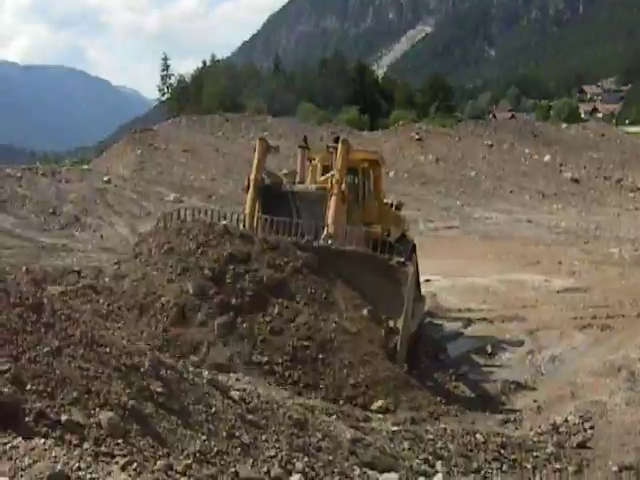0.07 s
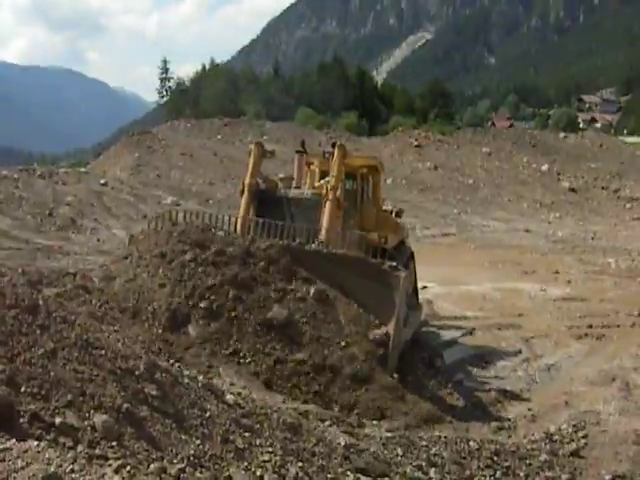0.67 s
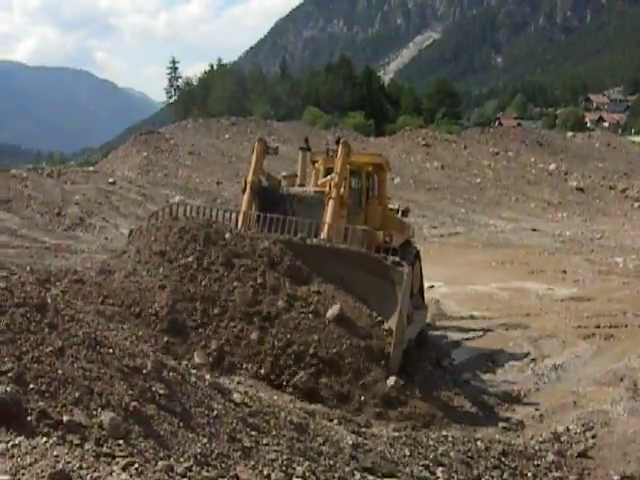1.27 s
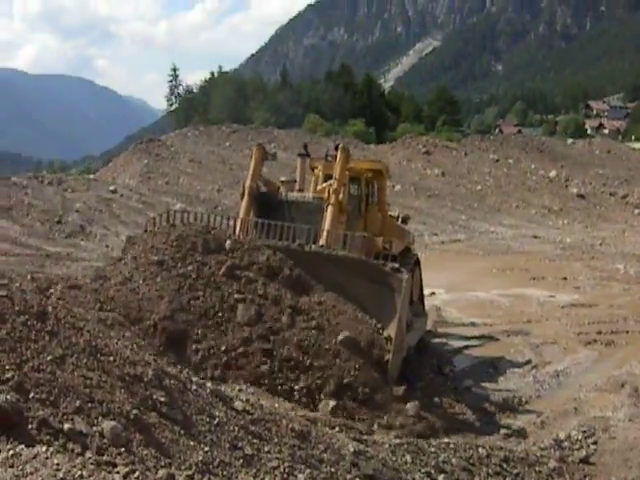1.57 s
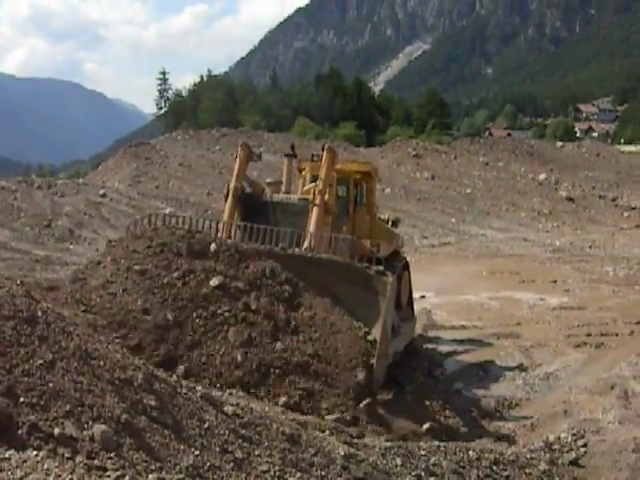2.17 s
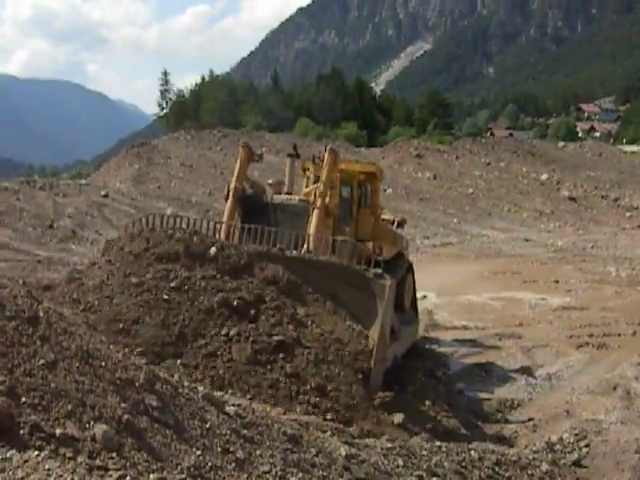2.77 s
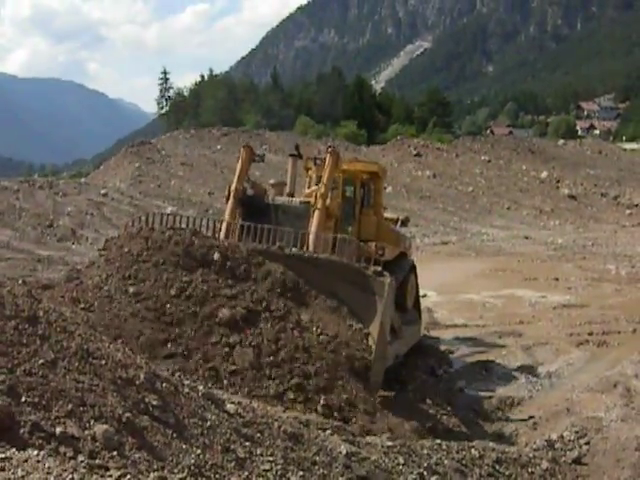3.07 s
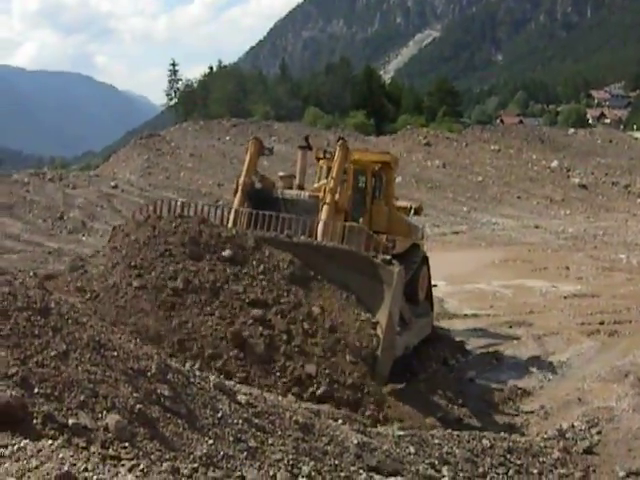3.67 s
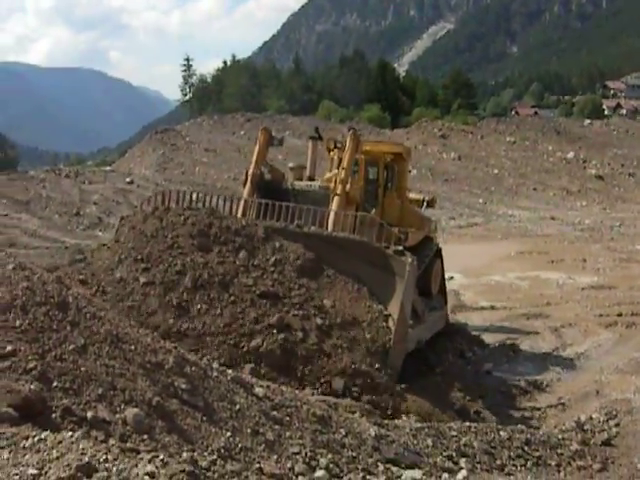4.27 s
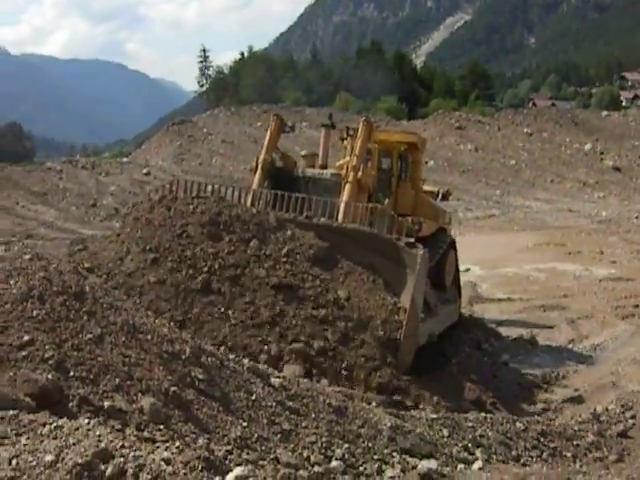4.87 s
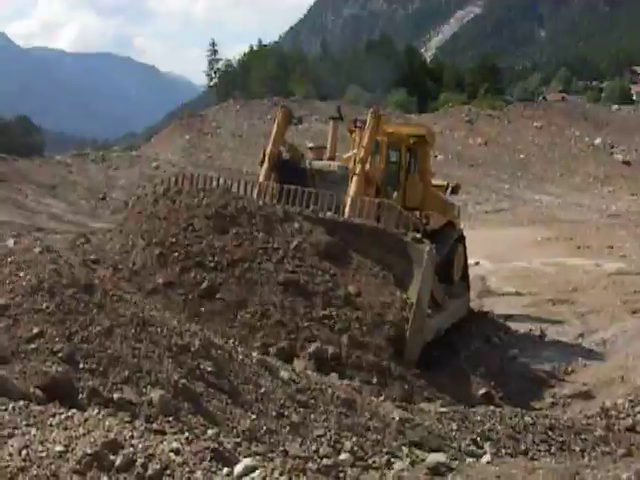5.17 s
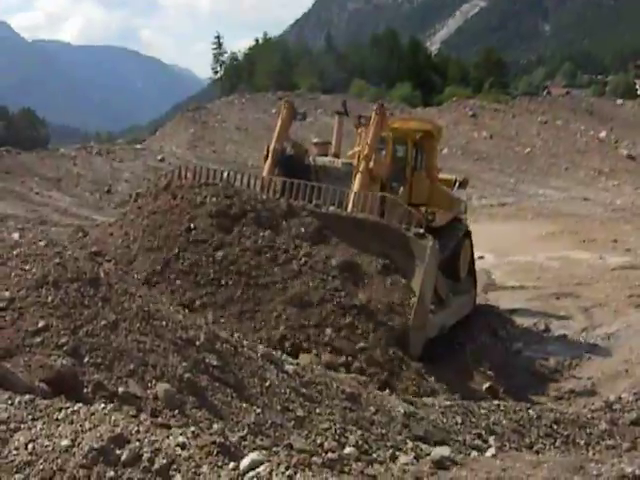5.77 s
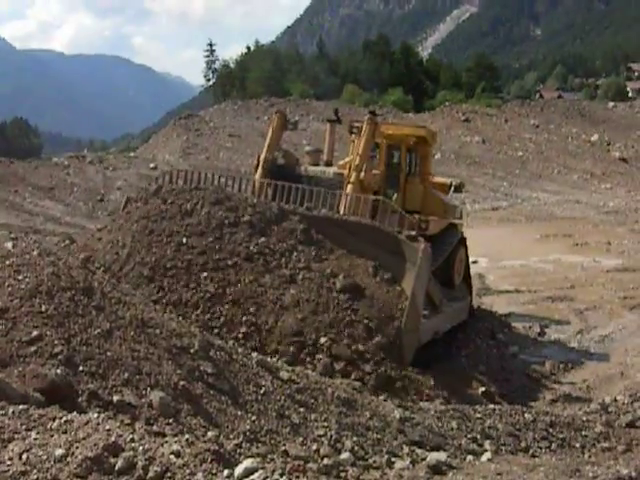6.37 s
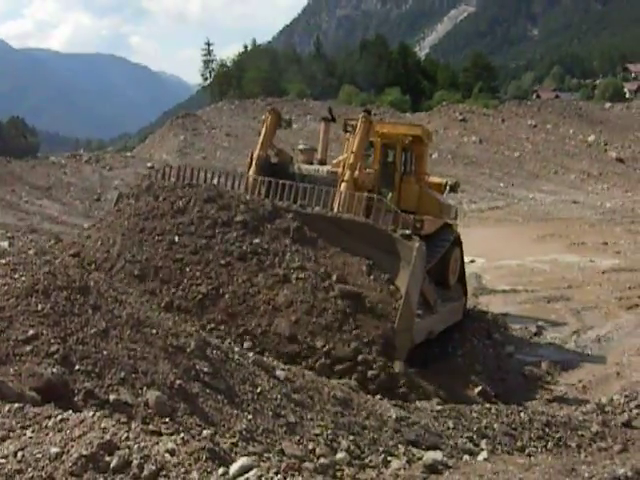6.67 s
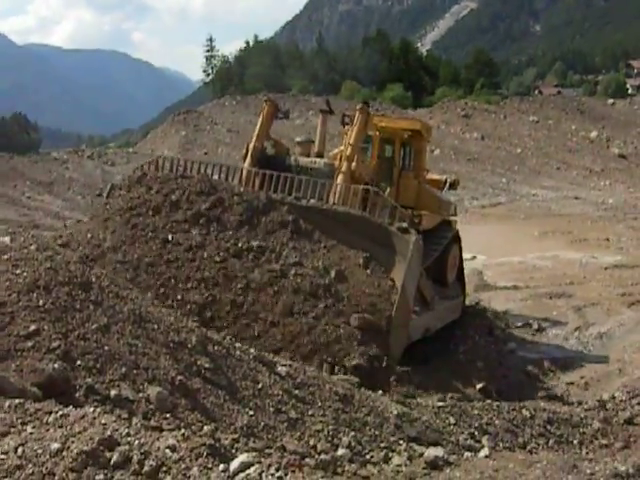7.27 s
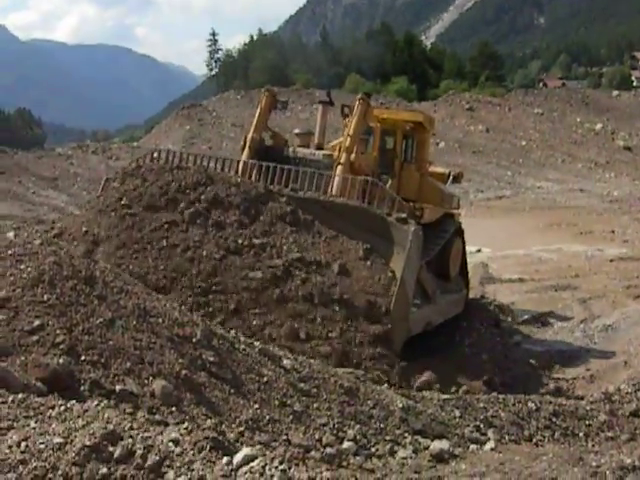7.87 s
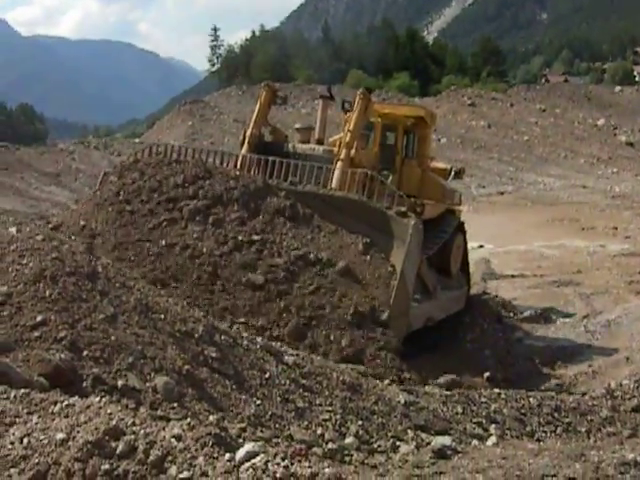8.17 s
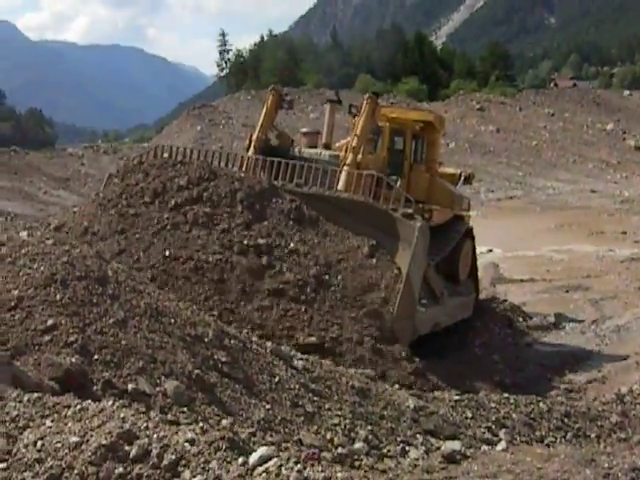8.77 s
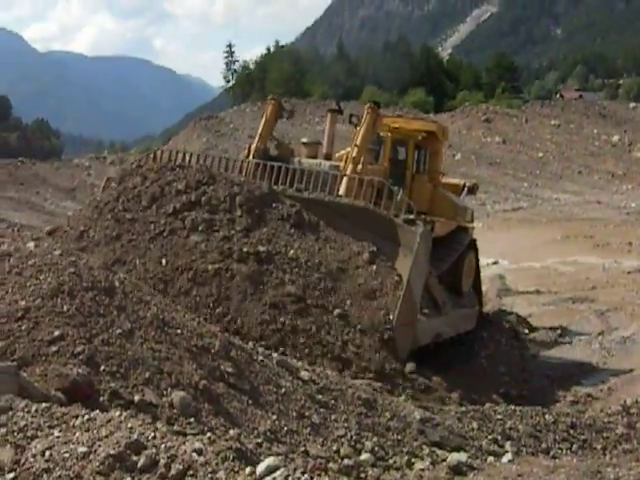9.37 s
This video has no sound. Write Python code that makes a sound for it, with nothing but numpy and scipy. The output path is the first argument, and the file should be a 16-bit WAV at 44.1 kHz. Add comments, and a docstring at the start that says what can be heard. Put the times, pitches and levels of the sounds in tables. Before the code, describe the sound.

Out in the open, a bulldozer pushes gravel, its loud diesel running continuously with a wavering hum and dipping a little each time the load grows. Beneath it come small slides of rattling stones, light metal clinks and a few brief track squeaks. Wind rumbles and thumps on the microphone in uneven gusts, strongest in the middle and near the end. The sound is slightly muffled.

```python
"""Bulldozer pushing gravel

A diesel at full throttle lugs and recovers as the blade bites, under the drone of its cooling fan.
Stones slide ahead of the blade while the steel tracks clink and squeak. Gusts buffet the microphone
of a small camera, whose fast gain control ducks the machine at the hard thumps."""
import sys
import numpy as np
from scipy.fft import rfft, irfft, next_fast_len
from scipy.io import wavfile
from scipy.ndimage import uniform_filter1d, map_coordinates

SR = 44100
rng = np.random.default_rng(int(sys.argv[2]) if len(sys.argv) > 2 else 0)


def file_out(sig):
    """Save sig as 16-bit WAV at sys.argv[1]."""
    # one column per channel
    cols = np.atleast_2d(sig).T
    # limit, then scale
    lim = np.clip(cols, -1, 1)
    pcm = np.round(lim * 32767).astype(np.int16)
    wavfile.write(sys.argv[1], SR, pcm)


N = 424241


def engine(full_speed_hz=26.82):
    """Combustion pulses a roar and a clatter; the exhaust booms at speed and thins as the diesel lugs."""
    # crankshaft speed, sagging each time the blade bites: t/s, f/Hz
    speed = [(0, 27.13), (.6, 27.14), (.95, 26.42), (1.27, 25.88), (1.7, 26.2), (2.1, 26.54), (2.5, 26.58),
             (2.8, 26.75), (3.2, 26.55), (3.6, 25.71), (4.17, 24.9), (4.6, 25.9), (4.95, 26.3),
             (5.65, 26.68), (6, 26.48), (6.55, 25.25), (6.85, 25.01), (7.35, 26.03), (7.7, 26.27),
             (8.25, 26.26), (9, 25.79), (9.5, 25.18)]
    # loudness of the roar and the clatter, rising during the strong gusts: t/s, level/dB
    roar_level = [(0, 2.5), (.6, 1), (1.3, 1), (2, 0), (3.3, 1), (4, -1), (4.7, 0.8), (5.5, -1), (6.8, 0),
                  (7.3, 0.5), (7.9, -1), (8.6, 1), (9.0, -2), (9.6, -0.5)]
    # muffler and engine bay resonances: f/Hz, width/Hz, level/dB
    body = [(183, 80, -6), (202.6, 40, -2), (269, 45.3, 0), (706, 114, -3.5), (998, 63.5, -4)]
    # clatter spectrum: f/Hz, level/dB
    clatter_eq = [(25, -22.5), (60, -22), (115, -6.5), (160, -2.5), (250, 0), (420, -5.5), (600, 4),
                  (870, -3), (1150, 1.5), (1650, -4), (1950, -1), (2250, -2.5), (2700, -2), (3200, -5.5),
                  (3650, -16.5), (4000, -21), (4400, -44)]
    # exhaust tones: crankshaft order, level/dB at full speed, loss/dB per Hz of sag
    exhaust_tones = [(2, -48, 2), (2.5, -50, -1.5), (4, -37, 1.5), (5.5, -39.5, -1.5), (6, -35, 1.5),
                     (7, -37.5, -1), (7.5, -35, 2), (8, -29, 2.5), (8.5, -34, -1.5), (9.5, -21, 8),
                     (10, -33, -0.5), (10.5, -36, -3), (11, -35, 0), (11.5, -37.5, -1)]
    crank_hz, = curves(speed)
    crank = np.cumsum(crank_hz) / SR
    sag_hz = np.maximum(full_speed_hz - crank_hz, 0)
    swell_db, = curves(roar_level)
    roar = amp(-20 + swell_db + 0.18 * wobble(9))
    roar *= resonant(firing(crank, depth=0.86) * rng.standard_normal(N), body)
    clatter = amp(-18 + swell_db + 0.3 * wobble(9.1))
    clatter *= coloured(firing(crank, depth=0.39) * rng.standard_normal(N), clatter_eq)
    exhaust = sum(amp(-loss_db * sag_hz) * tones(crank, [(order, db)], flutter_db=.8, drift=.2)
                  for order, db, loss_db in exhaust_tones)
    return roar + clatter + exhaust


def firing(crank, depth):
    """Eight cylinders, each with its own strength, give four pulses a turn."""
    count = 4 * crank
    strength = 1 + 0.65 * rng.standard_normal(8)
    return 1 + depth * strength[count.astype(int) % 8] * np.sin(np.pi * count) ** 4


def stack(half_width_hz=41):
    """Rushing gas rings the exhaust stack in a narrow band that slowly sinks."""
    # hollow ring, strongest early on: t/s, f/Hz, level/dB
    ring = [(0, 668, -27), (.6, 678, -25.5), (1.3, 658.5, -25.5), (2.1, 659.7, -28.5), (2.7, 650.7, -25.5),
            (3.4, 653.3, -30), (5, 646, -32.5), (7, 648.8, -28), (8.5, 643.6, -27), (9.6, 647.5, -31)]
    centre_hz, level_db = curves(ring)
    phase = 2 * np.pi * np.cumsum(centre_hz) / SR
    sway = lambda: filtered(rng.standard_normal(N), lambda hz: 1 / (1 + (hz / half_width_hz) ** 2))
    return amp(level_db) * unit(sway() * np.cos(phase) + sway() * np.sin(phase))


def fan():
    """The cooling fan sounds its blade rate and overtones, which swell and fade as the machine turns."""
    # blade rate, trailing the engine gently on a slipping drive: t/s, f/Hz
    speed = [(0, 132.1), (.8, 132.7), (1.15, 131.7), (1.6, 128.2), (2.1, 128), (2.9, 129.9), (3.35, 129.7),
             (3.8, 128.4), (4.35, 124.4), (4.6, 123.6), (5.4, 126.2), (6, 128.6), (6.35, 128), (6.7, 126.5),
             (7.05, 124.3), (7.4, 124.3), (8.3, 126.8), (8.8, 127.3), (9.6, 124.3)]
    # overtones that swell together: multiple of the blade rate, level/dB
    partials = [(2, -36), (3, -31), (8, -39)]
    # faders for those overtones and a drone near 650 Hz: t/s, overtone gain/dB, drone level/dB
    faders = [(0, 0, -38), (.55, 1, -33), (1, -1, -26.5), (1.3, 1, -21.5), (1.9, 2, -30),
              (2.65, 2.5, -23.5), (3.25, 2, -38), (3.65, -1, -27), (4.1, -1, -32), (4.7, -6, -36),
              (5.4, -3, -28), (6.15, -1, -22.5), (6.5, 0, -27), (7.3, -6, -32), (7.9, -4, -28),
              (8.6, -5, -24), (9.6, -7, -29)]
    # throb at the blade rate: t/s, level/dB
    throb_level = [(0, -35.5), (1.5, -32.5), (1.9, -36.5), (9.6, -38.5)]
    # hum near 510 Hz: t/s, level/dB
    hum_level = [(0, -35), (1.3, -31), (1.9, -32), (2.5, -31), (3.2, -29.5), (3.7, -26.5), (4.2, -35.5),
                 (4.8, -36), (5.4, -27.5), (6.35, -25.5), (7.1, -34.5), (8.0, -31), (9.6, -42.5)]
    # whine near 760 Hz: t/s, level/dB
    whine_level = [(0, -41), (5, -40), (6, -33.5), (6.7, -29), (7.3, -30), (7.8, -28), (8.8, -41),
                   (9.5, -35)]
    blades = np.cumsum(curves(speed)[0]) / SR
    overtone_db, drone_db = curves(faders)
    blade_tones = lambda orders: tones(blades, orders, flutter_db=2, drift=.35)
    throb = amp(curves(throb_level)[0]) * blade_tones([(1, 0)])
    overtones = amp(overtone_db) * blade_tones(partials)
    hum = amp(curves(hum_level)[0]) * blade_tones([(4, 0)])
    drone = amp(drone_db + 1.5 * wobble(45)) * blade_tones([(5, 0)])  # fast wobble roughens it
    whine = amp(curves(whine_level)[0]) * blade_tones([(6, 0)])
    return throb + overtones + hum + drone + whine


def gravel():
    """Stones click against each other in small slides ahead of the blade."""
    # how much gravel is sliding: t/s, level/dB
    sliding = [(0, -29), (.7, -32), (1, -23), (1.4, -29.5), (1.85, -25), (2.3, -25.5), (2.9, -32),
               (3.4, -22.5), (4.2, -26), (4.8, -26), (5.25, -23), (6.3, -29), (6.75, -24.5), (7.6, -28),
               (8.4, -26), (9.6, -27.5)]
    # spectrum of the clicks: f/Hz, level/dB
    stone_eq = [(200, -14), (700, -0.5), (1500, -5), (2700, -1), (3300, -2), (3700, -4.5), (4400, -37.5)]
    sliding_db, = curves(sliding)
    clicks = impacts(rate=4000, spread_db=4.5) * rng.choice([-1, 1], N)
    return amp(sliding_db + 1.4 * wobble(14)) * coloured(clicks, stone_eq)


def tracks(shoe_width_hz=34, clink_db=-29.5, top_hz=3550):
    """Steel pins slip in their dry links with a rough squeak; the shoes clink all the while."""
    # link squeaks: t/s, half length/s, f/Hz, width/Hz, level/dB
    slips = [(1.945, 0.06, 2650, 46, -23), (2.155, 0.48, 1680, 10.35, -29.5), (3.366, 0.06, 2645, 98, -27),
             (5.223, 0.04, 2627, 60, -32), (6.18, .06, 2758, 41.4, -30), (6.657, 0.037, 2625, 39, -19),
             (6.903, 0.033, 2617, 38, -22), (7.373, 0.027, 2059, 70, -22), (7.773, 0.069, 2380, 40, -35.5)]
    # ring of the steel shoes: f/Hz, relative level/dB
    shoe_modes = [(1830, -1.5), (1915, -1), (2025, -2.5), (2330, 1.5), (2420, -2), (2505, 1), (2620, -7),
                  (2720, -0.5), (3090, -1), (3310, -4)]
    t, squeaks = np.arange(N) / SR, np.zeros(N)
    for s, half, hz, width, db in slips:
        swell = amp(db) * np.exp(-((t - s) / half) ** 2)
        squeaks += swell * resonant(rng.standard_normal(N), [(hz, width, 0)])
    clinks = sum(amp(db) * resonant(impacts(rate=14, spread_db=1.5), [(hz, shoe_width_hz, 0)])
                 for hz, db in shoe_modes)
    return filtered(squeaks + amp(clink_db) * unit(clinks), lambda hz: 1 / (1 + (hz / top_hz) ** 20))


def wind(thump_width_s=0.00042):
    """Eddies strike the microphone port as an uneven patter of pressure pulses on a rough rush."""
    # buffeting spectrum: f/Hz, level/dB
    buffet_eq = [(30, -37), (80, -19), (125, -6), (190, 0), (310, 3), (450, 0.5), (700, -4.5), (1050, -8),
                 (1600, -16), (3000, -31), (4400, -56.5)]
    # the hardest eddies: t/s, peak level/dB
    thumps = [(0.691, -1.5), (1.628, 1), (3.546, 0.5), (3.934, -2), (4.400, 3), (4.469, 2), (4.509, 11.5),
              (4.533, 6), (4.546, -2), (4.560, -6), (4.590, 7), (4.598, 0), (4.624, -1), (5.679, 2),
              (5.730, 11), (5.857, 3), (6.016, 4.5), (6.043, 5), (6.976, -0.5), (7.054, -2), (7.147, 1),
              (7.164, 2.5), (7.205, 4), (7.222, 5), (7.325, 4), (7.406, -2), (8.214, 2.5), (8.379, -2),
              (8.444, 2), (8.464, 2.5), (8.494, 3), (8.543, 4.5), (8.572, -1), (8.610, 4), (8.661, 3),
              (8.732, 6.5), (8.872, -3), (8.881, 7), (8.940, 0), (9.149, -2), (9.163, -1), (9.473, 2)]
    eddy_count = np.floor(np.cumsum(115 * amp(5 * np.tanh(wobble(100)))) / SR)
    strikes = np.diff(eddy_count, prepend=0) * rng.uniform(0.55, 1, N) * rng.choice([-1, -1, 1], N)
    turbulence = rng.standard_normal(N) * amp(3 * wobble(170))
    rush = np.tanh(coloured(turbulence, buffet_eq) / 2)
    eddies = unit(coloured(strikes, buffet_eq) + amp(2.5) * unit(rush))
    out = gusting() * eddies
    t = np.arange(N) / SR
    for s, db in thumps:
        near = slice(int((s - .01) * SR), int((s + .01) * SR))
        u = (t[near] - s) / thump_width_s
        out[near] -= amp(db) * (1 - u * u) * np.exp(-u * u / 2)  # the port passes no steady pressure
    return out


def gusting(breeze_db=-29, attack_s=0.0021, release_s=0.0099):
    """Strength of the wind: each gust rises, holds and dies away over a restless breeze."""
    # gusts on the microphone: t/s, hold/s, level/dB
    gusts = [(0.11, 0.045, -21), (0.354, 0.24, -18), (0.55, 0.087, -16), (1.027, 0.04, -12.5),
             (1.407, 0.044, -13), (1.587, 0.079, -19), (1.95, 0.052, -14), (3.131, .055, -18),
             (3.491, 0.07, -11), (4.289, 0.036, -14.5), (4.379, 0.058, -12.5), (4.464, 0.046, -6),
             (4.547, 0.085, -10.5), (4.99, 0.061, -10.5), (5.544, 0.052, -19.5), (5.64, 0.14, -10),
             (5.814, 0.049, -15), (6.007, 0.061, -9), (6.959, 0.064, -13), (7.044, 0.11, -10.5),
             (7.154, .17, -10.5), (7.36, 0.12, -14.5), (8.177, 0.18, -13.5), (8.40, .045, -15),
             (8.479, 0.026, -12), (8.547, 0.1, -9), (8.693, 0.032, -5.5), (8.797, .04, -18),
             (8.847, 0.036, -8.5), (8.93, 0.022, -9.5), (9.1, 0.074, -13.5), (9.466, 0.05, -15.5)]
    t = np.arange(N) / SR
    power = amp(breeze_db + 2.5 * wobble(12)) ** 2
    for start, hold, db in gusts:
        linger_s = 0.051 * hold  # longer gusts come and go more slowly
        rise = np.maximum(start - t, 0) / (attack_s + linger_s)
        fall = np.maximum(t - start - hold, 0) / (release_s + linger_s)
        power += (amp(db) * np.exp(-rise - fall)) ** 2
    return np.sqrt(power)


def gain_control(x, ceiling_db, release_s, lag_s=.0005):
    """Peaks over the ceiling pull the gain down within a millisecond; deep cuts recover fastest."""
    sensed = x - .2 * uniform_filter1d(x, size=30)  # the detector is a little deaf to bass
    level = np.sqrt(np.abs(uniform_filter1d(sensed ** 2, size=32)))
    excess_db = np.maximum(20 * np.log10(level + 1e-9) - ceiling_db, 1e-6)
    ramp = np.arange(N) / SR / release_s
    cut_db = np.exp(np.maximum.accumulate(np.log(excess_db) + ramp) - ramp)  # decaying peak hold
    late_db = np.pad(cut_db, (int(lag_s * SR), 0))[:N]  # the front of each thump slips through
    return x * amp(-uniform_filter1d(late_db, size=24))


def settling(start_s=.033, fade_s=.018, boost_db=2, hold_s=0.45, settle_s=0.94):
    """The camera's gain fades in quickly, stays high for a moment and sinks to normal."""
    t = np.maximum(np.arange(N) / SR - start_s, 0)
    fade_in = 1 - np.exp(-t / fade_s)
    return fade_in * amp(boost_db * np.clip(1 - (t - hold_s) / settle_s, 0, 1))


def tones(turns, orders, flutter_db, drift):
    """Harmonics of a turning part; each flutters in strength and phase on its way through moving air."""
    out = np.zeros(N)
    for order, db in orders:
        phase = 2 * np.pi * (order * turns + rng.random()) + drift * wobble(9)
        out += amp(db + flutter_db * np.tanh(wobble(6.4))) * np.sqrt(2) * np.sin(phase)
    return out


def impacts(rate, spread_db):
    """Randomly timed impulses of scattered size, about rate a second."""
    return (rng.random(N) < rate / SR) * amp(spread_db * rng.standard_normal(N))


def resonant(x, modes):
    """x through resonances (f/Hz, width/Hz, level/dB) of alternating polarity, at rms 1."""
    def response(f):
        return sum((-1) ** k * amp(db) * 1j * f * width / (hz * hz - f * f + 1j * f * width)
                   for k, (hz, width, db) in enumerate(modes))
    return unit(filtered(x, response))


def coloured(x, spectrum):
    """x through an EQ curve (f/Hz, level/dB) on a log frequency axis, at rms 1."""
    f, db = np.transpose(spectrum)
    return unit(filtered(x, lambda hz: amp(np.interp(np.log(hz + 1), np.log(f), db))))


def filtered(x, response):
    """x through a complex frequency response."""
    size = next_fast_len(N + SR // 2)
    return irfft(rfft(x, size) * response(np.fft.rfftfreq(size, 1 / SR)), size)[:N]


def wobble(rate):
    """A smooth random curve, rate knots a second."""
    return map_coordinates(rng.standard_normal(int(N * rate / SR) + 4), [np.arange(N) * rate / SR])


def curves(rows):
    """One automation curve for each column after the time."""
    s, *cols = np.transpose(rows)
    return [np.interp(np.arange(N) / SR, s, c) for c in cols]


def amp(db):
    """Decibels to gain."""
    return 10 ** (np.asarray(db) / 20)


def unit(x):
    """Scale to rms 1."""
    return x / np.sqrt(np.mean(x ** 2) + 1e-20)


def scene():
    """The machine, its tracks and its gravel in open air, wind at the listener."""
    return (engine() + stack() + fan() + gravel() + wind() + tracks())[None]


def record(dry):
    """Gain control, the settling level, a soft overload and the narrow band of the camera."""
    bottom_hz, top_hz = 36, 4340
    ducked = gain_control(dry[0], ceiling_db=-10, release_s=0.028) * settling()
    rounded = ducked / (1 + np.abs(ducked / .8) ** 5) ** (1 / 5)
    band = lambda hz: hz ** 3 / np.sqrt((hz ** 6 + bottom_hz ** 6) * (1 + (hz / top_hz) ** 80))
    return filtered(rounded, band)[None]


dry = scene()
out = record(dry)
file_out(out)
```